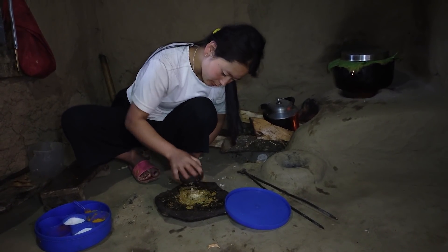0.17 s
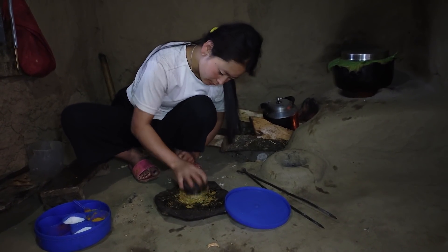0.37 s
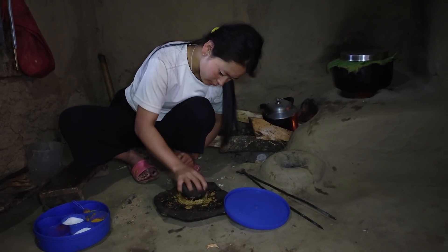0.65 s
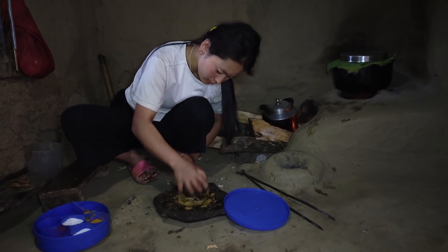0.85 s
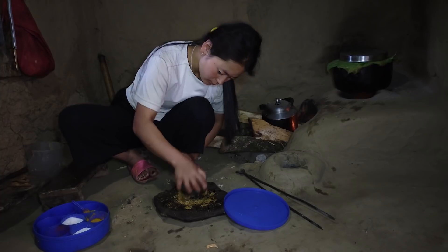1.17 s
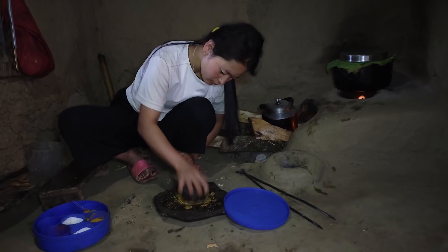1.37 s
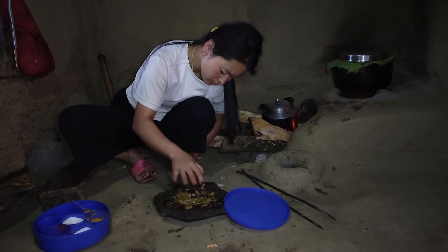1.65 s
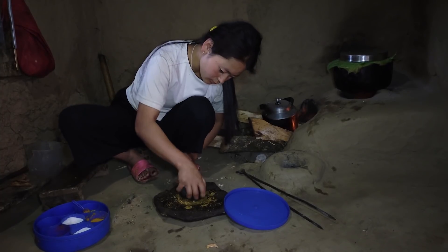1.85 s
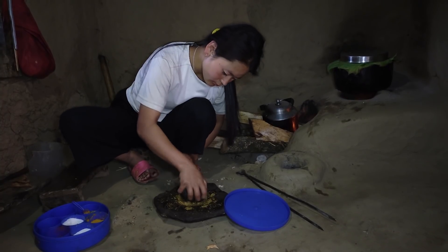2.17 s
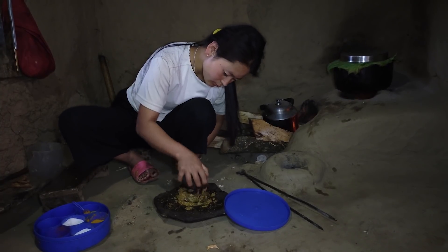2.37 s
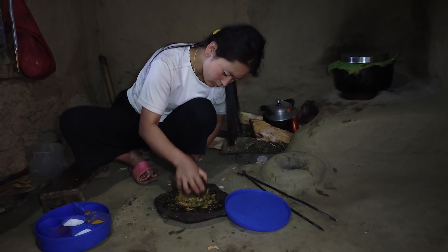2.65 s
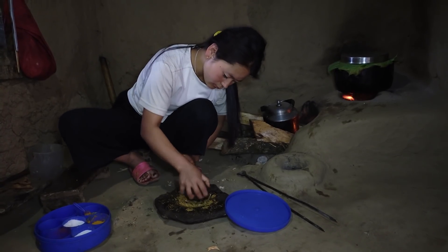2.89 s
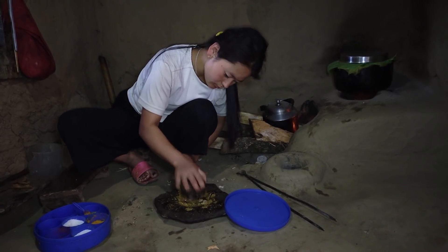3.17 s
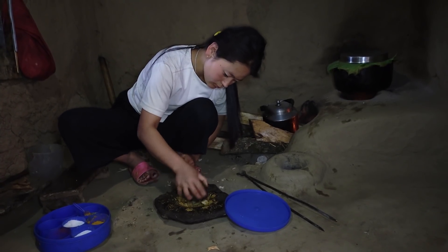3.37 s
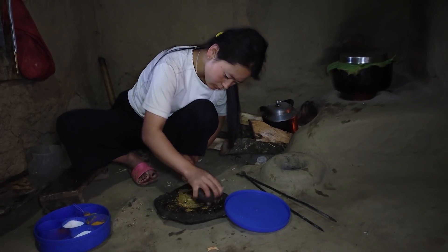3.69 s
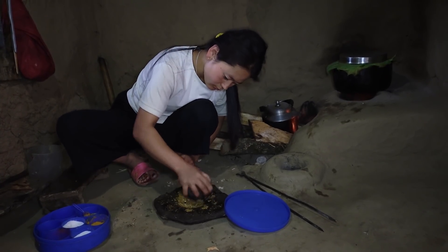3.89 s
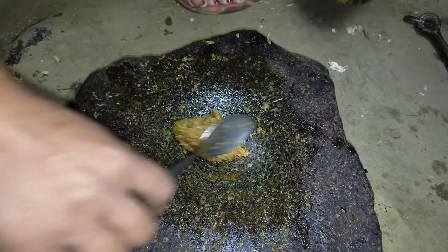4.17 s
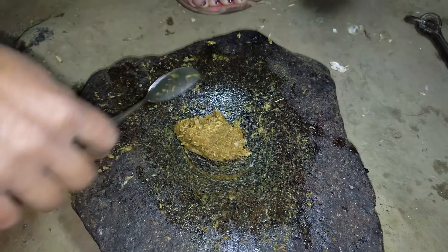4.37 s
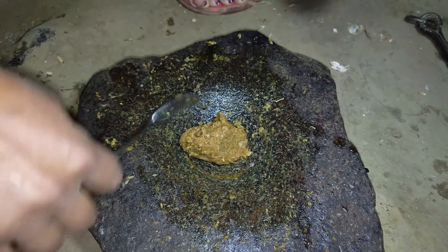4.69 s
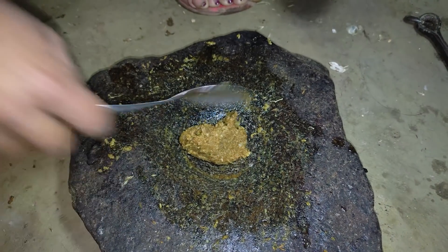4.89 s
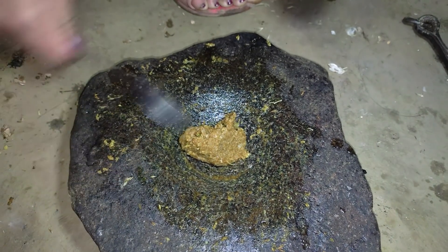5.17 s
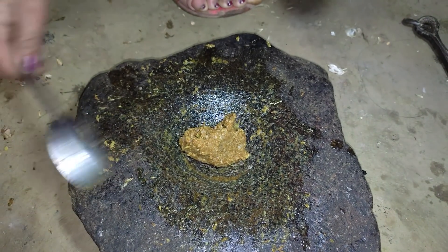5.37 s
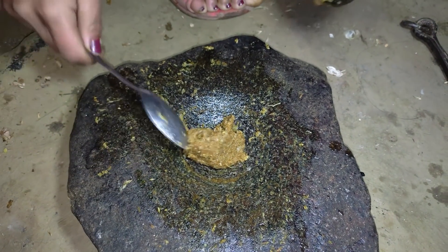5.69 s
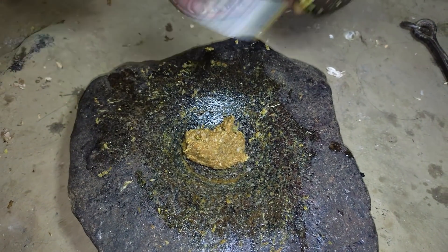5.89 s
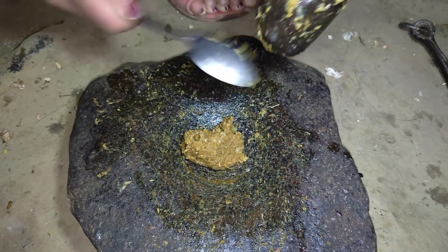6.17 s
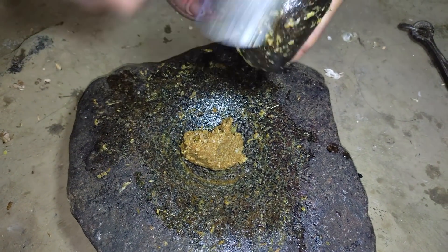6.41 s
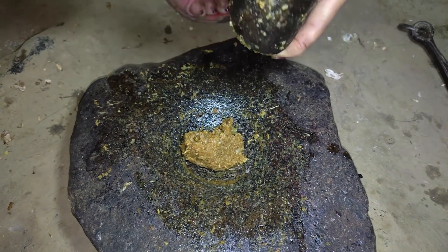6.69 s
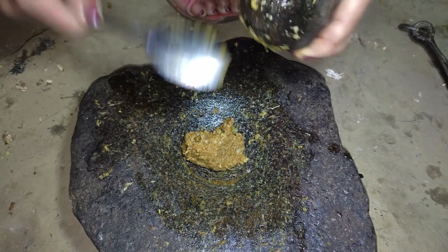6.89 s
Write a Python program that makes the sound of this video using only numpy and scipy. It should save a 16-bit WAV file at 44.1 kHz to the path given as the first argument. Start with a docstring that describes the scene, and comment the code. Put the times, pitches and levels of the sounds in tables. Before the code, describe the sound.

In a small earthen kitchen a hand stone pounds wet paste on a slab, nearly three blows a second, each squelching and thudding while the slab clunks and rocks. Some blows crack on bare stone. A faint bird whistles midway. After four seconds a steel spoon taps and scrapes the gritty slab in short, bright strokes, recorded close in stereo over low rumble and thin high whine.

```python
"""A hand stone pounds wet spice paste on a stone slab in a small earthen kitchen: each blow squelches, thuds and tips
the slab, and some strike bare stone or set the slab rocking. Then, close by, a steel spoon lands on the gritty slab,
glides and bites, stroke after stroke. Behind lie a low rumble, a thin high whine and a faint bird. Random grains
and noise excite resonances of slab, stone, ground and spoon; shaped noise makes the rumble, gliding sines the bird."""
import sys
import numpy as np
from scipy import signal
from scipy.fft import rfft, irfft, next_fast_len
from scipy.io import wavfile
from scipy.ndimage import map_coordinates

SR = 44100
rng = np.random.default_rng(int(sys.argv[2]) if len(sys.argv) > 2 else 0)


def generate_wav(sig):
    """Save sig (samples, or channels by samples) to the path in sys.argv[1] as 16-bit PCM at SR."""
    pcm = np.round(np.clip(np.atleast_2d(sig).T, -1, 1) * 32767).astype(np.int16)
    wavfile.write(sys.argv[1], SR, pcm)


N = 310539
SPAN = SR * 3 // 4  # samples in one event
T = np.arange(SPAN) / SR
HZ = np.fft.rfftfreq(SPAN, 1 / SR)
TIME = np.arange(N) / SR

# resonances of the hand stone: frequency_hz, width_hz, level_db
STONE_MODES = [(845, 49, -20), (1000, 49, -2), (1377, 120, 2), (1560, 130, -3), (1860, 45, -3.5),
               (2239, 81, 6), (2330, 20, 3.5), (2830, 70, -0.5), (3305, 90, -17.5)]
# resonances of the steel spoon: frequency_hz, width_hz, level_db
SPOON_MODES = [(2470, 59, -16), (3220, 160, -0.5), (4340, 1000, -9.5), (4820, 1100, -2.5), (6440, 204, -1),
               (11630, 660, -5), (12400, 77, 6), (13370, 42, 7), (16000, 87, -11)]
# relative spectrum of stony contact: frequency_hz, level_db
CRACK_SPECTRUM = [(60, -26.5), (300, -3), (550, -12), (850, 1), (1250, 5), (1900, -2), (2900, -5.5),
                  (4000, -13.5), (5500, -32), (9000, -27.5), (15000, -30.5)]
# relative spectrum of wet paste: frequency_hz, level_db
PASTE_SPECTRUM = [(300, -18), (1000, -14), (2200, -1.5), (4000, 0.5), (6700, 3), (9500, -4), (12500, 2),
                  (15500, -5.5)]


def amp(db):
    """Level law: twenty decibels make a factor of ten in amplitude."""
    return 10 ** (np.asarray(db) / 20)


def unit(x):
    """Power normalisation: scale to rms 1."""
    return x / np.sqrt(np.mean(x ** 2) + 1e-20)


def burst(x):
    """Energy normalisation: scale a hit to the energy of a hundredth of a second at rms 1."""
    energy = np.sum(x ** 2) / len(np.atleast_2d(x))  # mean over the channels
    return x * np.sqrt(SR / 100 / (energy + 1e-20))


def along(points, hz):
    """Interpolate (frequency, value) points on a logarithmic frequency axis."""
    f, v = np.transpose(points)
    return np.interp(np.log(hz + 1), np.log(f), v)


def wobble(rate, time=TIME):
    """Slow random modulation: a smooth curve through rate random knots a second."""
    knots = rng.standard_normal(int(time[-1] * rate) + 4)
    return map_coordinates(knots, [time * rate])


def arch(length, start=0):
    """Half-sine envelope: a smooth swell and fall."""
    return np.sin(np.pi * np.clip((T - start) / length, 0, 1))


def dull(hz):
    """First-order low-pass: soft contact holds back what lies above hz."""
    return 1 / (1 + 1j * HZ / hz)


def colour(points):
    """Minimum phase: the causal response with a given spectrum, found by folding its cepstrum."""
    cepstrum = irfft(np.log(amp(along(points, HZ))), SPAN)
    cepstrum[1:SPAN // 2] *= 2
    cepstrum[SPAN // 2 + 1:] = 0
    return np.exp(rfft(cepstrum))


def body(modes, detune=0., scatter_db=0.):
    """Modal superposition: damped resonances, shifted a little at random by grip and contact point."""
    response = 0
    chance = rng.standard_normal((len(modes), 2))
    for k, ((f, w, db), (shift, lift)) in enumerate(zip(modes, chance)):
        gain = (-1) ** k * amp(db + scatter_db * lift)
        response = response + gain * 1j * HZ * w / ((f * (1 + detune * shift)) ** 2 - HZ ** 2 + 1j * HZ * w)
    return response


def through(x, response):
    """Convolution theorem: filter one event by multiplying spectra."""
    return irfft(rfft(x, SPAN) * response, SPAN)


def grains(rate, spread_db):
    """Random impulse train: tiny fractures of unequal size, rate a second, at rms 1."""
    hit = rng.random(SPAN) < rate / SR
    sign = rng.choice([-1, 1], SPAN)
    return unit(hit * sign * amp(spread_db * np.clip(rng.standard_normal(SPAN), -2, 2)))


def diffuse(size):
    """Diffuse-field coherence: stereo noise, alike in the bass and nearly unrelated in the treble."""
    # left-right likeness: frequency_hz, correlation (0 to 1)
    likeness = [(130, 0.91), (300, 0.83), (700, 0.33), (1500, 0.25), (3000, 0.03)]
    correlation = along(likeness, np.fft.rfftfreq(size, 1 / SR))
    turn = np.arccos(np.clip(correlation, 0, 1)) / 2
    mid, side = rfft(rng.standard_normal((2, size))) * [np.cos(turn), np.sin(turn)]
    return irfft([mid + side, mid - side], size)


def kitchen(x, near_db, wet_db, near_t60=0.026):
    """Room response: direct sound, quick scatter off floor and body, then the walls' short tail."""
    # reverberation time: frequency_hz, t60_s
    decay_times = [(100, 0.27), (250, 0.25), (700, 0.13), (2000, 0.16), (6500, 0.16), (13000, 0.12)]
    hz, t, bins = signal.stft(diffuse(SPAN), SR, nperseg=256)
    fading = bins * amp(-60 * t / along(decay_times, hz)[:, None])
    tail = signal.istft(fading, SR, nperseg=256)[1][:, :SPAN]
    tail = tail * (1 - np.exp(-T / 0.0055))  # the walls answer gradually
    near = diffuse(SPAN) * amp(-60 * T / near_t60)
    direct = burst(1. * (T == 0))
    answer = amp(near_db) * burst(near) + amp(wet_db) * burst(tail) + direct
    return through(x, rfft(answer / np.linalg.norm(answer[0])))


def add(out, s, x):
    """Linear superposition: mix an event in at time s."""
    start = max(round(s * SR), 0)
    out[:, start:start + SPAN] += x[:, :N - start]


def background(count=5):
    """Shaped noise: a rumble whose bands swell independently, quiet air, and an electronic whine."""
    # relative spectra of the rumble and of the air: frequency_hz, level_db
    rumble_spectrum = [(15, -77.5), (25, -43.5), (37, -37.5), (45, -28.5), (59, -12.5), (118, -5.5),
                       (181, -8), (210, -1), (301, -4), (492, -27), (600, -16.5), (780, -46.5),
                       (1320, -120)]
    air_spectrum = [(240, -39), (400, -4.5), (562, -7), (616, -7.5), (3020, -13.5), (4440, -14.5),
                    (5430, -17), (11200, -27.5), (12900, -16.5), (16000, -35.5)]
    # mean level of the rumble: time_s, level_db
    rumble_level = [(0, -51), (.9, -58.5), (1.85, -48), (2.3, -57.5), (2.85, -52.5), (3.6, -53.5),
                    (7.04, -56.5)]
    lump_db, lumps_per_s = 4.5, 14  # depth and pace of the bands' swells
    size = next_fast_len(N)
    hz = np.fft.rfftfreq(size, 1 / SR)

    def noise(points):
        """Diffuse noise with the given spectrum, rms 1."""
        return unit(irfft(rfft(diffuse(size)) * amp(along(points, hz)), size)[:, :N])

    band_of = np.digitize(hz, np.geomspace(100, 302, num=count))  # band edges in Hz
    spectrum = rfft(noise(rumble_spectrum), size)
    lumps = 0
    for k in range(count + 1):
        band = irfft(spectrum * (band_of == k), size)[:, :N]
        lumps = lumps + band * amp(lump_db * wobble(lumps_per_s))
    level_db = np.interp(TIME, *np.transpose(rumble_level)) + 2.0 * wobble(6)
    rumble = amp(level_db) * unit(lumps)
    air = amp(-62) * noise(air_spectrum)
    whine_hz = 12812 + 14 * wobble(120)  # the pitch flickers slightly
    whine = amp(-61.5) * np.sin(2 * np.pi * np.cumsum(whine_hz) / SR)
    return rumble + air + whine


def bird():
    """Frequency modulation: a thin whistle from outside flicks up, pauses and slides down."""
    # bird calls: start_s, top_pitch_hz, level_db, fall_length_s
    calls = [(2.06, 6830, -52, 0.063), (2.289, 6900, -56.5, 0.13), (2.509, 6850, -55, 0.31),
             (2.768, 6880, -55.5, 0.022)]
    rise_s, pause_s = .038, 0.028
    rise_from, fall_to = .89, .57  # shares of the top pitch
    fall_glide_s, fade_db_per_s = 0.12, 24.5
    out = np.zeros((2, N))
    falling = np.maximum(T - rise_s - pause_s, 0)
    rise = np.interp(T, [0, rise_s], [rise_from, 1])
    fall = fall_to + (1 - fall_to) * np.exp(-falling / fall_glide_s)
    for s, top_hz, db, fall_s in calls:
        fall_swell = np.sqrt(np.abs(arch(fall_s, rise_s + pause_s)))
        loudness = arch(rise_s) + fall_swell * amp(-1 - fade_db_per_s * falling)
        call = loudness * np.sin(2 * np.pi * np.cumsum(top_hz * rise * fall) / SR)
        add(out, s, amp(db) * kitchen(call, near_db=-18.5, wet_db=-5.0))
    return out


def smear(length, dull_hz):
    """Viscous shear: wet paste crackles faintly as it is spread, dulled by four equal low-passes."""
    response = colour(PASTE_SPECTRUM) * dull(dull_hz) ** 4
    crackle = unit(through(grains(rate=20000, spread_db=-1.5), response))
    return kitchen(arch(length) * crackle, near_db=6.5, wet_db=-7)


def bump(length):
    """Low-passed noise under a half-sine pressure: a soft, muffled shift of weight."""
    # relative spectrum of the shift: frequency_hz, level_db
    shuffle_spectrum = [(40, -27.5), (80, -11), (130, -3), (200, 0), (260, -0.5), (330, -24), (600, -30.5),
                        (2000, -64)]
    shift = unit(through(rng.standard_normal(SPAN), colour(shuffle_spectrum)))
    return kitchen(arch(length) * shift, near_db=-8.0, wet_db=-5.5)


def handling():
    """Slow excitation: smears through the paste and dull bumps on the earthen floor."""
    # smears: start_s, length_s, level_db, dull_hz (corner of each low-pass)
    smears = [(.08, 0.28, -59, 2980), (0.837, 0.047, -48, 4530), (2.438, 0.022, -46.5, 2600),
              (2.756, 0.45, -51.5, 3200), (3.971, 0.18, -53, 5530), (4.614, 0.12, -57, 16200)]
    # bumps: start_s, length_s, level_db
    bumps = [(0.417, .14, -38), (3.042, 0.034, -44), (5.345, 0.035, -47.5), (5.982, 0.08, -45.5),
             (6.663, 0.057, -43)]
    out = np.zeros((2, N))
    for s, length, db, dull_hz in smears:
        add(out, s, amp(db) * smear(length, dull_hz))
    for s, length, db in bumps:
        add(out, s, amp(db) * bump(length))
    return out


def clunk():
    """Impact on a damped plate: the slab meets the floor with a dull, gritty clunk."""
    # resonances of the slab: frequency_hz, width_hz, level_db
    slab_modes = [(790, 32, 2.5), (1056, 23, -4), (1260, 37, -14), (1660, 460, -16.5), (1930, 660, -10.5)]
    crushing = grains(rate=4000, spread_db=7.5) * np.exp(-T / .008) * (1 - np.exp(-T / 0.0014))
    ring = burst(through(crushing, body(slab_modes, detune=0.029, scatter_db=3.5) * dull(5000)))
    clack = burst(through(crushing, colour(CRACK_SPECTRUM) * dull(3500) ** 3))
    return burst(kitchen(ring + amp(-7) * clack, near_db=1, wet_db=-2.5))


def rocking(count=3):
    """Energy loss at each impact: let go, the slab rocks to rest, each swing shorter and weaker."""
    # slab drops back, and the last row is a low tap that sounds like it: start_s, level_db, loss_db (per rock)
    rocks = [(.478, -33, 7.5), (1.207, -25, 26), (1.913, -39, 4.5), (2.685, -48, 13.5),
             (3.889, -36.5, 31.5), (4.459, -48, 29)]
    gap_s, shrink = .064, 0.96  # first swing, and each later swing over the one before
    out = np.zeros((2, N))
    for s, db, loss_db in rocks:
        for k in range(count):
            add(out, s, amp(db - loss_db * k) * clunk())
            s += gap_s * shrink ** k
    return out


def tap():
    """Impulsive modal excitation: the spoon's edge ticks on the stone and rings its bowl."""
    # relative spectrum of the edge: frequency_hz, level_db
    edge_spectrum = [(60, -2.5), (400, -5), (1200, -2), (4000, 3.5), (7000, 2), (10000, -8), (12000, 2),
                     (15500, -3)]
    tick = rng.standard_normal((2, SPAN)) * np.exp(-T / 0.0012)
    tick = burst(through(tick, colour(edge_spectrum)))
    ring = burst(through(tick, body(SPOON_MODES, detune=.014, scatter_db=2)))
    return burst(kitchen(tick + amp(1.5) * ring, near_db=-2.5, wet_db=-10, near_t60=0.048))


def rasp(skips, hollow_hz, dull_hz, ring_db, stone_db):
    """Cavity resonance: grit heard through the gap under the bowl, plus the ring of steel and stone."""
    # relative spectrum of the grit: frequency_hz, level_db
    grit_spectrum = [(200, 23), (1300, -0.5), (2300, 0), (4000, 1), (6500, 2.5), (8500, -3.5),
                     (10500, -12.5), (12500, 10), (14300, 0), (15500, 3)]
    # range in which rubbing wakes the stone: frequency_hz, width_hz, level_db
    rubbed_range = [(1270, 350, 0)]
    ratio = 1j * HZ / hollow_hz
    hollow = ratio ** 3 / (1 + 0.75 * ratio + ratio ** 2) / (ratio + 0.27)
    grit = unit(through(skips, colour(grit_spectrum) * hollow * dull(dull_hz)))
    ring = unit(through(skips, body(SPOON_MODES, detune=.014, scatter_db=2.5)))
    rubbed_stone = body(STONE_MODES, detune=0.068, scatter_db=6.5) * body(rubbed_range)
    stone = unit(through(skips, rubbed_stone))
    return unit(unit(grit + amp(ring_db) * ring) + amp(stone_db) * stone)


def spoon():
    """Friction: each stroke taps down, glides lightly, then bites and skips over grit until it lifts."""
    # strokes: start_s, tap_db, bite_delay_s, bite_length_s, bite_db, swell_db (over the bite),
    # hollow_pitch_hz (at first), dull_hz, steel_ring_db (at first), stone_ring_db
    strokes = [(4.155, -23, 0.0031, 0.075, -17.5, -1, 2234, 11950, 1.5, -30),
               (4.506, -45, 0.005, .033, -18.5, 11.5, 1580, 4500, -4, -2.5),
               (4.562, -24.5, 0, 0.053, -29, -3.5, 2000, 3717, -27, -10),
               (4.775, -21, 0.031, 0.042, -15, 3.5, 1830, 3180, -12.5, -4),
               (5.151, -31, 0.056, 0.066, -18, -6.5, 2200, 9030, 1, -14.5),
               (5.433, -15, 0.025, 0.092, -17.5, -3.5, 2200, 9000, 1.5, -13.5),
               (5.669, -17, 0.033, 0.052, -17, 0, 2400, 8460, 3, -15.5),
               (6.14, -20.5, 0.019, 0.044, -13.5, 2.5, 3010, 9440, 0, -28),
               (6.458, -39, 0.0084, 0.091, -13.5, 5.5, 2760, 10580, 1, -30),
               (6.802, -55.5, .035, 0.019, -9.5, -1, 3190, 9070, -4, -25.5)]
    # the spoon's edge catches on a grain: start_s, level_db
    catches = [(4.042, -45.5), (4.539, -23.5), (5.192, -25.5), (5.534, -25), (6.372, -49)]
    skip_db, skips_per_s = 3.5, 220  # unevenness of the grit
    glide_db, glide_follows = -17, 0.56  # base level; dB it gains per dB of the tap
    attack_s, release_s, arch_db = 0.0021, .006, 1.5  # the pressure bulges in mid stroke
    out = np.zeros((2, N))
    for s, tap_db, wait, length, db, swell_db, hollow_hz, dull_hz, ring_db, stone_db in strokes:
        t = np.maximum(T - wait, 0)
        u = np.clip(t / length, 0, 1)  # progress through the bite
        glide = amp(glide_db + glide_follows * tap_db) * np.exp(-t / attack_s)
        bite_db = db + swell_db * (u - .5) + arch_db * (np.sin(np.pi * u) - .5)
        bite = amp(bite_db) * (1 - np.exp(-t / attack_s))
        press = (glide + bite) * np.exp(-np.maximum(t - length, 0) / release_s)
        skipping = amp(skip_db * wobble(skips_per_s, T))

        def skips():
            """Uneven grains, partly shared by the two channels."""
            return skipping * grains(rate=3200, spread_db=5.5) * (.5 + rng.standard_normal((2, SPAN)))

        early = rasp(skips(), hollow_hz, dull_hz, ring_db, stone_db)
        # the bowl rolls over: a deeper hollow, less ring
        late = rasp(skips(), 0.86 * hollow_hz, dull_hz, ring_db - 3, stone_db)
        scrape = press * (np.sqrt(1 - u ** 2) * early + u * late)
        add(out, s, amp(tap_db) * tap() + kitchen(scrape, near_db=2, wet_db=-4, near_t60=0.022))
    for s, db in catches:
        add(out, s, amp(db) * tap())
    return out


def knocks():
    """Contact stiffness: bare stones crunch and ring, while soft contact keeps the highs out."""
    # stone meets bare stone: start_s, level_db, contact_pitch_hz, snap_db
    contacts = [(.001, -21, 686, -42), (0.3776, -8, 1156, -43), (2.585, -17.5, 835, -45),
                (2.9421, -9, 1550, -22)]
    snap_s, chatter_s, chatter_db = .0005, .0025, 2  # first touch; then the rough faces chatter
    out, stony = np.zeros((2, N)), colour(CRACK_SPECTRUM)
    for s, db, hz, snap_db in contacts:
        snap = through(rng.standard_normal(SPAN) * np.exp(-T / snap_s), colour(PASTE_SPECTRUM))
        add(out, s, amp(snap_db) * burst(kitchen(snap, near_db=-8, wet_db=-9)))
        ring = burst(irfft(body(STONE_MODES, detune=.008, scatter_db=4.5), SPAN))
        crack = burst(irfft(stony, SPAN))
        contact = 1 / (1 - (HZ / hz) ** 2 + 1j * 0.96 * HZ / hz) + 0.4 * dull(3 * hz)
        rattle = burst(grains(rate=9000, spread_db=0.5) * np.exp(-T / chatter_s))
        chatter = rfft(burst(1. * (T == 0)) + amp(chatter_db) * rattle)
        knock = burst(through(amp(-6.5) * ring + crack, chatter * contact * (1 - dull(.4 * hz))))
        crushing = grains(rate=4500, spread_db=0.5) * np.exp(-T / .021)  # grit breaks as the stone settles
        crunch = burst(through(crushing, stony * dull(3 * hz) * (1 - dull(hz))))
        struck = kitchen(knock + amp(-9.5) * crunch, near_db=-3.5, wet_db=-4.5, near_t60=0.047)
        add(out, s, amp(db) * burst(struck))
    return out


def pounding():
    """Momentum transfer: paste bursts, ground thuds, slab jolts and tips, and the stone drags on."""
    # blows: start_s, squelch_db, squelch_length_s, thud_db, tip_delay_s, tip_db, drag_db
    blows = [(0.0, -31, 0.014, -23.5, .045, -60, -59.5), (0.372, -39.5, 0.014, -26, .035, -31, -49),
             (.735, -26, 0.021, -39, .053, -50, -43.5), (1.135, -21, 0.011, -24, .033, -27, -82),
             (1.504, -24.5, 0.017, -31, .057, -45.5, -66), (1.848, -25.5, 0.021, -28, .045, -40, -70),
             (2.206, -23.5, 0.018, -28, .05, -51, -62.5), (2.576, -30, 0.022, -22, .045, -59, -62),
             (2.938, -36.5, 0.0063, -31.5, .045, -31.5, -73), (3.341, -23.5, 0.018, -34, .041, -43, -65),
             (3.734, -42.5, 0.011, -25.5, .048, -33.5, -52.5)]
    # resonances of the ground: frequency_hz, width_hz, level_db
    ground_modes = [(72.3, 17, -12.5), (113, 11, -3.5), (183.4, 24, -1), (264, 52, -9.5), (360, 220, -16.5)]
    swing_lead_s, swing_s, swing_db = 0.11, 0.04354, -55  # a soft bump as the stone is swung
    thud_lag_s, jolt_db = .005, -11  # the paste gives way; the slab's clunk against the thud
    drag_lag_s, drag_s, drag_dull_hz = .07, .13, 15100  # the stone is drawn through the paste
    out, wet = np.zeros((2, N)), colour(PASTE_SPECTRUM)
    for s, db, length, thud_db, tip_s, tip_db, drag_db in blows:
        if s > swing_lead_s:
            add(out, s - swing_lead_s, amp(swing_db) * bump(swing_s))
        u = T / max(length, .002)
        squeeze = (1 - np.exp(-u * 5)) ** 2 * np.exp(-u * 5.3)
        squelch = through(squeeze * grains(rate=12000, spread_db=7), wet)
        add(out, s, amp(db) * burst(kitchen(squelch, near_db=2, wet_db=2)))
        push = T * np.exp(-T / 0.00041)
        thud = through(push, body(ground_modes, detune=0.011, scatter_db=-1.5))
        thud = burst(kitchen(thud, near_db=-8.5, wet_db=-4.0))
        add(out, s + thud_lag_s, amp(thud_db) * (thud + amp(jolt_db) * clunk()))
        add(out, s + tip_s, amp(tip_db) * clunk())
        add(out, s + drag_lag_s, amp(drag_db) * smear(drag_s, drag_dull_hz))
    return out


def scene():
    """Superposition of everything that sounds in the kitchen."""
    return background() + bird() + handling() + rocking() + spoon() + knocks() + pounding()


def record(dry):
    """Stereo pickup: the left port leads, the two colour differently; peaks saturate before a band limit."""
    # difference of the ports: frequency_hz, left_minus_right_db
    port_difference = [(100, -2), (300, 1.5), (1200, 0.1), (4000, -2), (5500, -3.5), (6800, -16),
                       (8500, -4), (10000, 2), (12000, 10), (15000, 4)]
    lead_s, ceiling, cut_hz = 6e-5, .95, 15550
    size = next_fast_len(N + SPAN)
    hz = np.fft.rfftfreq(size, 1 / SR)
    ports = amp(np.outer([.5, -.5], along(port_difference, hz)))
    ports = ports / np.sqrt(np.mean(ports ** 2, axis=0))  # keep the total power
    lead = np.exp(2j * np.pi * np.outer([.5, -.5], hz) * lead_s)
    picked = irfft(rfft(dry, size) * ports * lead, size)
    rounded = picked / (1 + (picked / ceiling) ** 6) ** (1 / 6)
    band = 1 / np.sqrt(1 + (hz / cut_hz) ** 180)
    return irfft(rfft(rounded) * band, size)[:, :N]


dry = scene()
out = record(dry)
generate_wav(out)
```